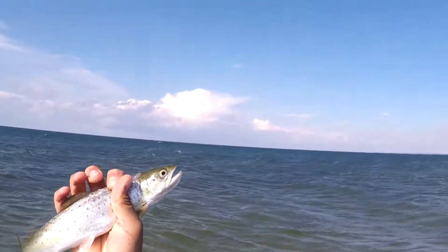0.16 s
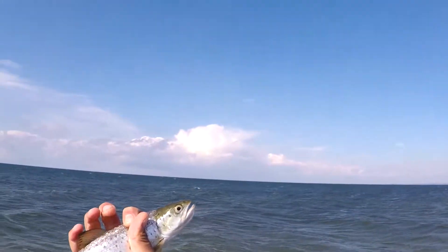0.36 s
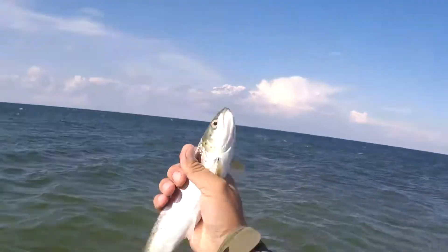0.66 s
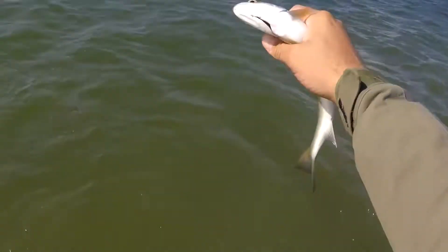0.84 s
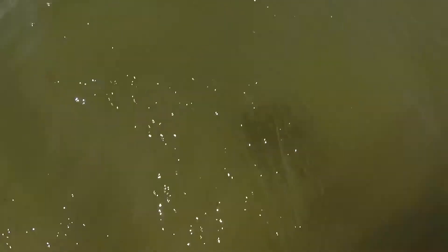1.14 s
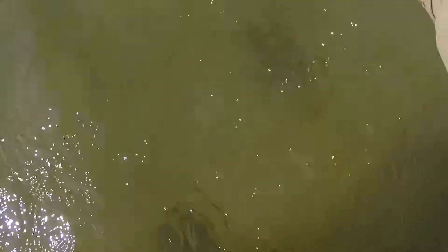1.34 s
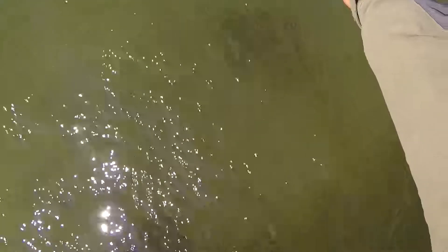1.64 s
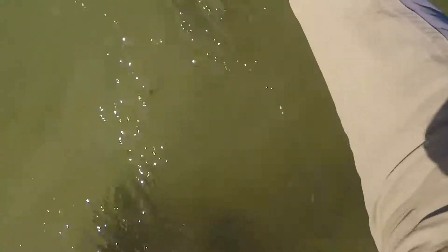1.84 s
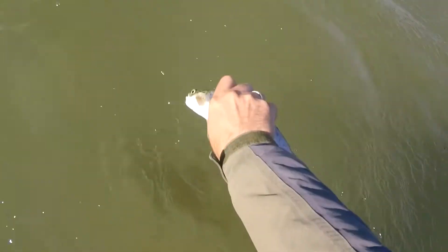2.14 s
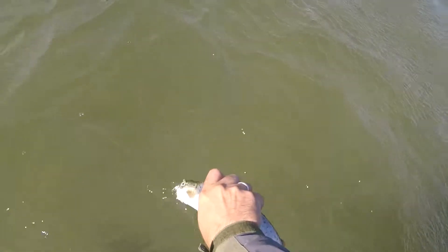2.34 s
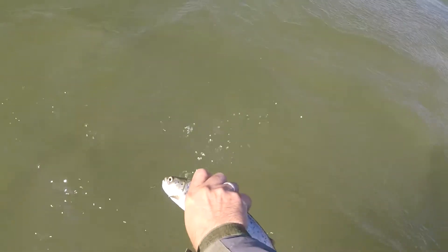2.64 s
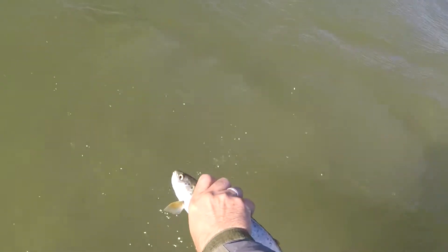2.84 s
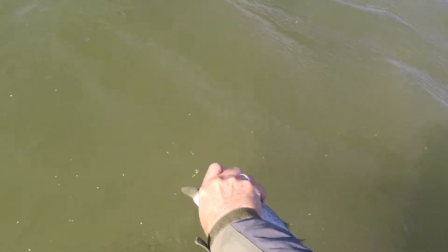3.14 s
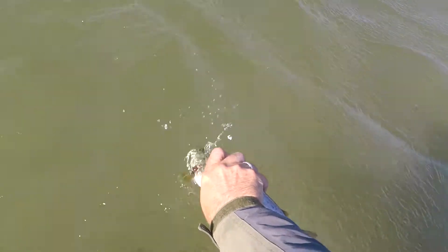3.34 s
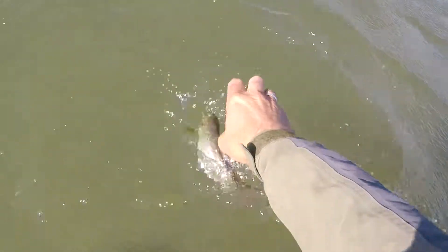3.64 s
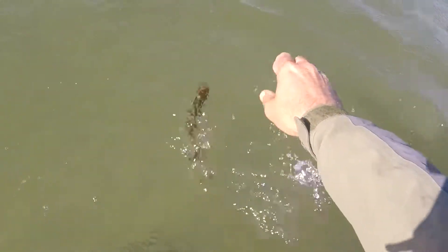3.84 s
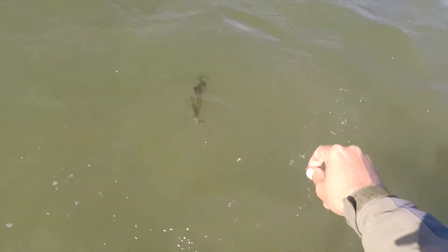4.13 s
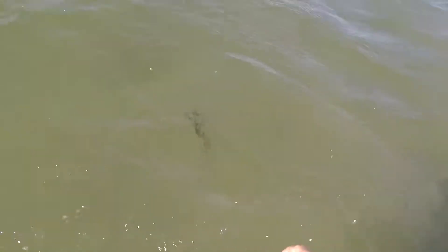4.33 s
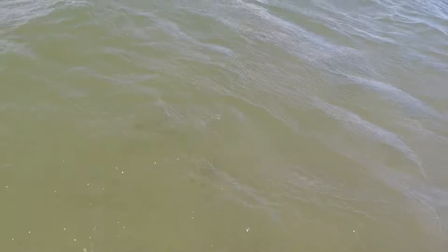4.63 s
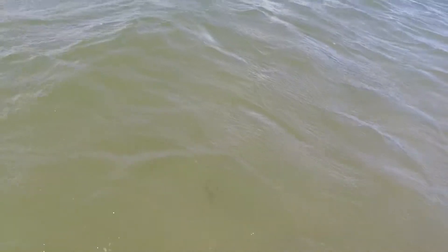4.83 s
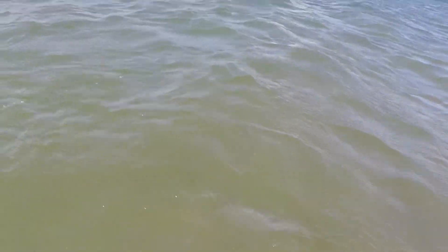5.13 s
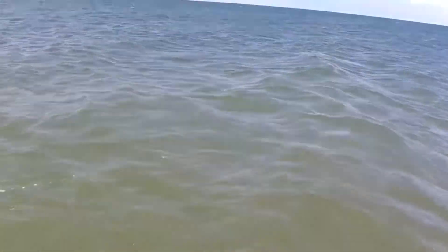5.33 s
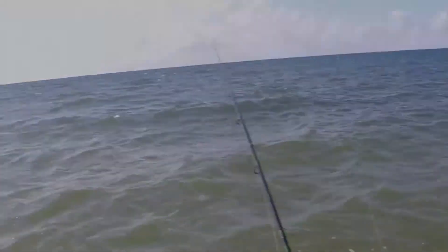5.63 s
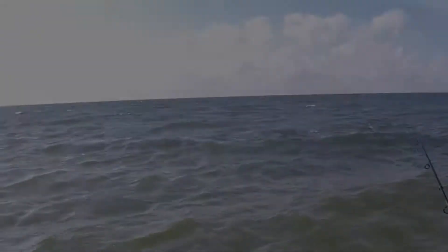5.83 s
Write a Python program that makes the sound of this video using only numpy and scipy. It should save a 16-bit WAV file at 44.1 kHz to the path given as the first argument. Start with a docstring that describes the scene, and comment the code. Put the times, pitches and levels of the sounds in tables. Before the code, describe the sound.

Hand and fish stir shallow sea water with irregular plops, splashes and bubbly gurgles while wind thumps the microphone and a sleeve rustles.

```python
"""A thump of wind and a slap of water come first, muffled, at a microphone on an angler's body.
A fish is let go in knee-deep sea water: plops and gurgles are ringing bubbles with slaps of noise.
Wind is flickering low noise with thumps; a sleeve rustles as noise and as clicks that ring a plastic case.
Drops and cloth snaps tick, a wavering sine whistles faintly twice, and banded noise is the wash of small waves.
"""
import sys
import numpy as np
from scipy import signal
from scipy.io import wavfile

SR = 44100
rng = np.random.default_rng(int(sys.argv[2]) if len(sys.argv) > 2 else 0)


def wrap_up_sound(samples):
    """Save the sound to the file named by the first command line argument, as 16-bit audio."""
    columns = np.atleast_2d(samples).T
    # keep every value between -1 and 1, then stretch to whole-number steps
    tamed = np.clip(columns, -1, 1)
    steps = np.round(tamed * 32767).astype(np.int16)
    wavfile.write(sys.argv[1], SR, steps)


N = 263585


def from_db(db):
    """Logarithmic level: decibels to amplitude gain."""
    return 10 ** (np.asarray(db) / 20)


def rms_one(x):
    """Power normalisation: scale to unit rms."""
    return x / np.sqrt(np.mean(x ** 2) + 1e-20)


def at_hz(points, hz):
    """Spectral envelope: interpolate levels on a log-frequency axis."""
    point_hz, point_db = np.array(points).T
    return np.interp(np.log(hz), np.log(point_hz), point_db)


def in_time(rows):
    """Control envelopes: each column after the time, interpolated to one value per sample."""
    s, *columns = np.transpose(rows)
    return [np.interp(np.arange(N) / SR, s, column) for column in columns]


def drift(rate):
    """Low-passed random fluctuation of rms 1: noise through two equal poles with a corner at rate Hz."""
    step = 40  # samples per coarse value
    r = np.exp(-2 * np.pi * rate * step / SR)
    coarse = rng.standard_normal(N // step + 2002)
    slow = signal.lfilter([1], [1, -2 * r, r * r], coarse)[2000:]  # the filter has settled
    return np.interp(np.arange(N) / step, np.arange(len(slow)), rms_one(slow))


def patchy_noise(spectrum, shared_db, own_db, rate):
    """Band-wise modulation: third-octaves of noise flicker partly together, partly alone; rms 1."""
    out, together = 0, drift(rate)
    edges = 25 * 2 ** (np.arange(29) / 3)
    white = rng.standard_normal((2, N))  # neighbouring bands use different noises
    for k, (low, high) in enumerate(zip(edges, edges[1:])):
        sos = signal.butter(2, [low, high], "band", fs=SR, output="sos")
        band = signal.sosfilt(sos, white[k % 2])
        band_db = at_hz(spectrum, np.sqrt(low * high))
        out = out + band * from_db(band_db + shared_db * together + own_db * drift(rate))
    return rms_one(out)


def random_sizes(spread_db):
    """Exponential spread of level in dB, capped at four times its mean, with random sign."""
    return from_db(spread_db * np.minimum(rng.exponential(1, N), 4)) * rng.choice([-1, 1], N)


def grains(per_s, low_hz, high_hz, cycles, spread_db, tilt_db):
    """Granular resonance: random clicks ring 18 two-pole resonators, tilted in dB per octave; rms 1."""
    clicks = random_sizes(spread_db) * (rng.random(N) < per_s / SR) + 1e-18
    dealt, out = rng.integers(0, 18, N), 0
    for k, hz in enumerate(np.geomspace(low_hz, high_hz, num=18)):
        r = from_db(-60 * hz / (cycles * SR))  # each pass falls 60 dB in the given cycles
        poles = [1, -2 * r * np.cos(2 * np.pi * hz / SR), r * r]
        once = signal.lfilter([1, 0, -1], poles, clicks * (dealt == k))
        ring = signal.lfilter([1 - r], poles, once)  # the second pass softens the onset
        out = out + rms_one(ring) * from_db(tilt_db * np.log2(hz / low_hz))
    return rms_one(out)


BURST_ROUNDNESS = 1.5   # 1 a pointed peak, 2 a bell


def bursts(rows, rise, slow_tail, splash_tail):
    """Cavity resonance: brief tones climb in pitch as a cavity shrinks; a slap of noise may go with each.

    Rows: peak_s, peak_db, pitch_hz, length_ms, then optional slap_rel_db and slap_top_hz."""
    tones, splashes = np.zeros((2, N + SR))
    noises = rng.standard_normal((len(rows), SR // 8))
    for (peak_s, db, hz, ms, *splash), phase, noise in zip(rows, rng.random(len(rows)), noises):
        width = ms / 2355  # s, the standard deviation of a bell with that half-level length
        span = min(len(noise), int(40 * width * SR))
        t = np.arange(span) / SR - 4.5 * width  # 0 at the peak
        side = np.where(t < 0, width / slow_tail, width * slow_tail)
        away = np.hypot(t / side, .5)
        fade_in = np.sin(np.pi / 4 * np.clip(t / width + 4.5, 0, 2)) ** 2
        shape = fade_in * np.exp(-.7 * (away ** BURST_ROUNDNESS - .5 ** BURST_ROUNDNESS))
        # the pitch climbs from (1 - rise) to (1 + rise) times hz
        climb = 2 * rise * width * np.log(np.cosh(np.minimum(t / width / 2, 20)))
        tone = np.cos(2 * np.pi * hz * (t + climb) + 2 * np.pi * phase)
        start = round((peak_s + t[0]) * SR)
        skip = max(0, -start)
        place = slice(start + skip, start + span)
        tones[place] += (from_db(db) * shape * tone)[skip:]
        if splash:
            rel_db, top_hz = splash if len(splash) == 2 else (splash[0], 14500)  # a snap is broadband
            band = signal.butter(7, [0.673 * hz, max(top_hz, 1.15 * hz)], "band", fs=SR, output="sos")
            onset = np.sin(np.pi / 4 * np.clip(t / width + 2, 0, 2)) ** 2
            dying = onset * np.exp(-np.maximum(t, 0) / (splash_tail * width))
            slap = rms_one(signal.sosfilt(band, noise))[:span]
            splashes[place] += (from_db(db + rel_db) * dying * slap)[skip:]
    return tones[:N], splashes[:N]


SWARM_MS, SWARM_DB, SWARM_SPREAD_DB = 16, -14, 3   # delay scale, level re the burst, spread either way
SWARM_CYCLES = 3.7   # length of each bubble in cycles


def swarm(rows, count):
    """Random secondary emission: smaller bubbles follow each burst at random, scattered over its band.

    Rows in: peak_s, peak_db, low_hz, top_hz; out: peak_s, peak_db, pitch_hz, length_ms."""
    draws = np.minimum(rng.random((len(rows), count, 3)), .95)
    out = []
    for (burst_s, db, low_hz, top_hz), own in zip(rows, draws):
        for late, size, place in own:
            peak_s = burst_s + .004 - SWARM_MS / 1000 * np.log(1 - late)  # exponential delay
            peak_db = db + SWARM_DB - 9 * late + SWARM_SPREAD_DB * (2 * size - 1)  # later is weaker
            pitch_hz = low_hz * (top_hz / low_hz) ** place
            out.append((peak_s, peak_db, pitch_hz, 1000 * SWARM_CYCLES / pitch_hz))
    return out


# density of wind noise: pitch_hz [Hz], level_db [relative dB per Hz]
WIND_SPECTRUM = [(20, -41), (50, -0.5), (110, 12), (200, 11), (330, 4.5), (600, -2.5), (1500, -67.5)]
# wind on the port: time_s [s, point on the level curve], level_db [dB rms, before the gain in wind()]
GUSTS = [(0, -17), (.04, -33.5), (.25, -38.5), (.4, -40.5), (.53, -50.5), (.8, -49), (.88, -45),
         (1.1, -45.5), (1.21, -34), (1.33, -33), (1.4, -45.5), (1.6, -37.5), (1.76, -33.5), (1.91, -30),
         (1.98, -35), (2.13, -27), (2.28, -36.5), (2.58, -38), (2.68, -32), (2.98, -44.5), (3.1, -42),
         (3.39, -51.5), (3.58, -46.5), (3.62, -34), (3.7, -40.5), (3.78, -21), (3.84, -26), (3.87, -24),
         (3.98, -26.5), (4.06, -34.5), (4.18, -31), (4.31, -36.5), (4.41, -26.5), (4.61, -34), (4.65, -43),
         (4.7, -36.5), (4.76, -45), (5.24, -47.5), (5.36, -52), (5.59, -40.5), (5.7, -38), (5.75, -31.5),
         (5.82, -40), (5.89, -43), (5.98, -39)]
# strongest eddies on the port: peak_s [s, moment of the burst's peak], peak_db [dB], pitch_hz [Hz],
# length_ms [ms, about half level]
BUFFETS = [(.016, -3.5, 220, 4.8), (.03, -13.5, 219, 8.9), (.384, -32, 330, 8.5), (.908, -31, 238, 7.8),
           (1.207, -23.5, 205, 7.8), (1.764, -21, 242, 8), (2.019, -20.5, 210, 15), (2.065, -25.5, 300, 17),
           (2.121, -21, 293, 7.1), (2.51, -16, 229, 4.6), (2.542, -18.5, 136, 7.2), (2.691, -12, 175, 7.3),
           (2.699, -15.5, 232, 2.3), (2.748, -27, 190, 8.5), (2.734, -15, 207, 4.2), (3.63, -24.5, 137, 13),
           (3.731, -19.5, 282, 8.7), (3.863, -9, 138, 10.4), (3.891, -10.5, 278, 10),
           (4.041, -17, 160, 9.8), (4.136, -21, 123, 17), (4.15, -22.5, 190, 12), (4.18, -16, 300, 7.8),
           (4.398, -14.5, 222, 6.4), (4.488, -7, 195, 10.8), (4.598, -17, 220, 3.9), (5.553, -26, 322, 12),
           (5.759, -16, 191, 6.1), (5.799, -24, 287, 3)]


def wind():
    """Turbulent pressure: lumpy low noise on the port, with the strongest eddies as single thumps."""
    level_db, = in_time(GUSTS)
    lumps = patchy_noise(WIND_SPECTRUM, shared_db=2.5, own_db=2.0, rate=18.7)
    thumps = sum(bursts(BUFFETS, rise=0.041, slow_tail=0.94, splash_tail=2))
    return from_db(level_db + 2.0) * lumps + thumps


SLAP_DB, SLAP_DB_PER_OCTAVE = -6, -3.5   # slap re a 500 Hz plop; small pockets slap less
# water stirred by legs, hand and fish: time_s [s, point on the level curves],
# level_db [dB, gurgle before the gain in water()], sharp_db [dB, share of small bubbles, likewise]
SLOSH = [(0, -17.5, 5.5), (.04, -34, 10), (.15, -42.5, 8.5), (.22, -38, 7), (.3, -42.5, 11),
         (.4, -39.5, 8.5), (.53, -51, 14.5), (.76, -44, 7), (.87, -46.5, 12), (1.1, -54, 13.5),
         (1.27, -37, 12.5), (1.4, -47, 13.5), (1.65, -43.5, 10), (1.88, -33.5, 5), (1.98, -43, 13.5),
         (2.13, -25.5, 4), (2.23, -27.5, 2.5), (2.3, -32, 2.5), (2.35, -27.5, -1), (2.4, -30, 0),
         (2.43, -32.5, 8), (2.462, -36, 11), (2.49, -32, 12.5), (2.525, -33, 7), (2.6, -35, 11),
         (2.68, -33, 15.5), (2.77, -35.5, 9), (2.86, -37.5, -6), (2.91, -37, 5), (2.98, -34.5, 8),
         (3.13, -55.5, 14), (3.5, -74, -10), (3.69, -52.5, 19), (3.78, -32, 1.5), (3.845, -33.5, 6),
         (3.87, -25.5, 6.5), (3.98, -18.5, 1), (4.02, -29.5, 10), (4.058, -29.5, 1), (4.11, -27.5, 2),
         (4.16, -24, -2), (4.22, -28.5, 5), (4.28, -30.5, 7.5), (4.33, -43, 15), (4.365, -35.5, 5),
         (4.4, -37, 9.5), (4.45, -31, 4.5), (4.54, -40.5, 9.5), (4.62, -47, 17), (4.65, -53, 18),
         (4.7, -52, 16), (4.95, -52.5, 15), (5.03, -52, 8), (5.15, -51, 3), (5.24, -40, 1),
         (5.36, -55.5, -3), (5.53, -40.5, 5), (5.6, -41.5, 9), (5.67, -34, 5), (5.75, -22, -6.5),
         (5.89, -52, 18), (5.98, -30.5, 8.5)]
# air pockets that burst: peak_s [s, moment of the burst's peak], peak_db [dB], pitch_hz [Hz],
# length_ms [ms, about half level], slap_top_hz [Hz, top of the slap]
PLOPS = [(.004, -14.5, 600, 5.3, 1380), (.012, -13.5, 920, 3, 1570), (.014, -11, 365, 13, 945),
         (.023, -18.5, 720, 4.3, 1650), (.032, -23, 503, 7.9, 1320), (.21, -29.5, 680, 3.8, 1250),
         (.215, -41, 1900, 2.6, 2500), (.232, -32, 745, 6.1, 944), (.355, -32.5, 480, 5, 900),
         (.367, -34.5, 770, 6.1, 2130), (.747, -30.5, 1000, 5.5, 1320), (0.759, -32, 1150, 3.6, 1690),
         (.769, -21.5, 837, 3.66, 1140), (.785, -36.5, 854, 5.6, 1200), (.82, -38.5, 880, 7.4, 1200),
         (1.129, -24.5, 2510, 3, 3200), (1.193, -38.5, 2400, 3.9, 3000), (1.276, -26, 650, 6.4, 1000),
         (1.3, -21, 550, 4.9, 826), (1.313, -30, 680, 5.8, 1000), (1.733, -38, 2370, 5.1, 2900),
         (1.773, -29, 410, 8, 930), (1.87, -15, 526, 6, 1100), (1.896, -26.5, 710, 4.2, 1770),
         (1.9, -38, 2500, 2.05, 2880), (1.998, -42, 2380, 2.7, 2700), (2.073, -17.5, 550, 5.5, 895),
         (2.087, -35, 2270, 3.5, 2970), (2.108, -12.5, 667, 2.8, 1300), (2.116, -15, 720, 5.3, 1390),
         (2.148, -6.5, 840, 3.24, 1670), (2.154, -12, 1100, 2.5, 1780), (2.166, -25, 646, 7.1, 1460),
         (2.173, -24, 1050, 2.1, 1650), (2.105, -35, 2600, 3, 3000), (2.19, -29, 1630, 3.8, 1900),
         (2.205, -40, 2670, 4, 3000), (2.192, -24.5, 970, 15, 1950), (2.234, -11, 610, 5, 842),
         (2.258, -21.5, 570, 5.2, 860), (2.288, -26, 890, 4.7, 1200), (2.319, -22.5, 2140, 0.87, 2880),
         (2.334, -21, 348, 6.6, 734), (2.34, -33, 2400, 8.7, 2800), (2.35, -12.5, 816, 6.9, 1960),
         (2.41, -24, 400, 4.3, 716), (2.42, -25, 1370, 2.5, 2110), (2.442, -24, 776, 4.5, 1060),
         (2.511, -31.5, 1240, 6.5, 1950), (2.539, -23.5, 550, 8, 1380), (2.558, -23, 530, 7, 790),
         (2.57, -13.5, 1550, 1.65, 2120), (2.576, -23, 750, 8, 970), (2.598, -21.5, 1410, 4.3, 1720),
         (2.613, -22, 1740, 3.8, 2420), (2.634, -24, 650, 8.5, 850), (2.639, -30, 2600, 4.5, 3900),
         (2.665, -25.5, 493, 7.5, 990), (2.68, -42, 1500, 5.4, 2630), (2.697, -14.5, 950, 3, 1920),
         (2.7, -13.5, 480, 5.3, 845), (2.721, -20.5, 500, 6.7, 1020), (2.795, -29.5, 900, 2.4, 1810),
         (2.812, -26, 650, 8.1, 840), (2.825, -12.5, 966, 3, 2260), (2.842, -24, 770, 13, 1980),
         (2.858, -26.5, 2120, 2.45, 2770), (2.872, -22.5, 1030, 4.1, 1330), (2.884, -25.5, 900, 3.1, 1480),
         (2.93, -36, 1800, 2.4, 2600), (2.941, -31.5, 1500, 3.6, 2830), (2.959, -30, 1370, 5.8, 1930),
         (2.976, -37, 1600, 3.1, 2000), (3.013, -26, 1500, 3.4, 1970), (3.035, -39.5, 1300, 8.5, 2520),
         (3.124, -35, 590, 5.1, 736), (3.162, -52, 300, 9.7, 417), (3.704, -34.5, 710, 4.9, 1070),
         (3.757, -25.5, 890, 5.9, 1730), (3.765, -15.5, 400, 10.2, 810), (3.798, -15.5, 347, 12.8, 785),
         (3.783, -20, 480, 5, 900), (3.795, -28.5, 1500, 2.3, 2200), (3.821, -25, 330, 7.4, 700),
         (3.86, -14, 393, 6.4, 580), (3.886, -17.5, 553, 7, 1330), (3.901, -18.5, 380, 4.4, 1000),
         (3.902, -21.5, 2570, 2.1, 3830), (3.879, -36, 2800, 2.5, 3100), (3.915, -25, 1900, 1.7, 2700),
         (3.928, -25, 2300, 1.4, 2700), (3.951, -23, 1250, 2.8, 2500), (3.947, -15, 550, 4.3, 1500),
         (3.965, -17, 470, 7, 1080), (3.98, -18, 1100, 5.3, 1900), (3.987, -12.5, 720, 4.5, 1630),
         (3.993, -40, 2900, 1.3, 3100), (4.001, -30, 2200, 3, 2600), (4.023, -16.5, 576, 8.4, 737),
         (4.048, -25.5, 720, 4, 1000), (4.072, -13.5, 1020, 2.1, 1650), (4.079, -20.5, 1410, 3.5, 1980),
         (4.103, -15.5, 633, 2.75, 1430), (4.125, -19, 720, 5.5, 1400), (4.146, -14.5, 1340, 1.34, 2000),
         (4.155, -27.5, 448, 8.1, 1100), (4.161, -31, 1500, 2, 1900), (4.196, -42, 2750, 2.7, 3200),
         (4.206, -31, 1700, 3.7, 1950), (4.166, -28, 810, 3.8, 1160), (4.213, -11.5, 760, 2.2, 1670),
         (4.221, -14.5, 700, 3.9, 1680), (4.241, -23.5, 736, 3.2, 1610), (4.273, -21, 556, 8.7, 1060),
         (4.25, -40, 2850, 3, 3500), (4.274, -38, 2000, 2.2, 2300), (4.287, -20, 420, 8.2, 980),
         (4.301, -36, 660, 2.8, 1040), (4.33, -14.5, 846, 3.2, 1950), (4.397, -22, 450, 9.8, 845),
         (4.451, -19.5, 450, 4.7, 1100), (4.518, -17.5, 606, 4.16, 1510), (4.555, -33, 600, 4.3, 900),
         (4.607, -34, 500, 4.3, 1195), (4.61, -44, 1900, 4, 2200), (4.69, -37.5, 460, 8.1, 1100),
         (4.735, -40.5, 427, 6, 1300), (4.77, -45, 700, 4.6, 900), (4.99, -41.5, 850, 6.8, 1000),
         (5.015, -42, 800, 9.3, 1000), (5.028, -36, 793, 5.5, 1040), (5.05, -41, 760, 8.3, 1000),
         (5.062, -37, 720, 4, 900), (5.083, -46, 850, 4.2, 1000), (5.184, -27.5, 896, 2.25, 1690),
         (5.197, -17.5, 750, 4, 1170), (5.189, -13, 514, 5.27, 990), (5.194, -36, 825, 3, 1590),
         (5.2, -16.5, 470, 3.7, 1110), (5.204, -35, 900, 2, 1760), (5.221, -30, 747, 11.4, 1000),
         (5.235, -35, 710, 8.4, 1220), (5.643, -33.5, 900, 7.1, 2130), (5.624, -33, 310, 8.3, 600),
         (5.644, -38, 1850, 4.1, 2100), (5.672, -30, 620, 6, 1030), (5.688, -25, 560, 6.5, 1000),
         (5.701, -26, 487, 12.4, 1120), (5.723, -17, 705, 3, 1570), (5.74, -19.5, 570, 3.25, 1020),
         (5.731, -47, 3000, 3.9, 3200), (5.749, -29.5, 1250, 6.1, 1780), (5.755, -16, 420, 3.1, 1000),
         (5.758, -32, 472, 11, 960), (5.77, -23, 1220, 2.5, 1680), (5.815, -41, 1150, 6.2, 1500),
         (5.906, -35, 1050, 5, 1280), (5.919, -21.5, 1420, 2.1, 2410), (5.921, -47, 2300, 2, 3100),
         (5.937, -43.5, 3150, 5.3, 3600), (5.924, -26.5, 365, 10.6, 527), (5.945, -29, 1180, 2.6, 1960),
         (5.97, -36, 1330, 2, 1790)]


def water():
    """Bubble resonance: large and small bubbles ring in clumps; the share of small ones has its own curve."""
    level_db, sharp_db = in_time(SLOSH)
    clumps = from_db(3.0 * drift(11.0))
    large = grains(700 * clumps, low_hz=330, high_hz=1100, cycles=4.26, spread_db=2.0, tilt_db=-3.5)
    small = grains(1200 * clumps, low_hz=1000, high_hz=3045, cycles=14.0, spread_db=0.5, tilt_db=-4.0)
    gurgle = from_db(level_db - 3.0) * (large + from_db(sharp_db - 20.0) * small)
    plops = [(s, db, hz, ms, SLAP_DB + SLAP_DB_PER_OCTAVE * np.log2(hz / 500), top_hz)
             for s, db, hz, ms, top_hz in PLOPS]
    after = swarm([(s, db, 0.88 * hz, top_hz) for s, db, hz, ms, top_hz in PLOPS], count=8)
    return gurgle + sum(bursts(plops + after, rise=0.087, slow_tail=1.036, splash_tail=3.43))


# density of the wash: pitch_hz [Hz], level_db [relative dB per Hz]
SEA_SPECTRUM = [(18, -49.5), (30, -29), (114, -3), (252, -0.5), (503, -23.5), (711, -8.5), (2010, -26),
                (3630, -29.5), (6420, -71.5), (11100, -71.5), (14400, -100), (22000, -120)]


def sea():
    """Superposed small waves: a steady dull wash of noise, its bands flickering slowly."""
    return from_db(-51.5) * patchy_noise(SEA_SPECTRUM, shared_db=1.2, own_db=1.5, rate=5.0)


TICK_MS = 1.7   # about half level, before slow_tail stretches it
# density of the rustle: pitch_hz [Hz], level_db [relative dB per Hz]
RUSTLE_SPECTRUM = [(1200, -15), (2200, -23.5), (3200, 13.5), (5000, 2.5), (6300, -0.5), (7200, -32.5),
                   (9000, -60), (12000, -91), (20000, -110)]
# sleeve and spray: time_s [s, point on the level curves], level_db [dB, before the gains in sleeve()],
# top_db [dB, fine treble re level_db, likewise]
RUB = [(0, -56.5, -36), (.25, -60.5, -31), (.53, -69.5, -26), (.83, -65, -26), (.87, -63, -25),
       (1.1, -65, -8), (1.18, -46.5, -17), (1.215, -54, -7), (1.27, -51, -12), (1.4, -61, -12),
       (1.5, -56.5, -15), (1.6, -57.5, -14), (1.68, -56.5, -12), (1.76, -52, -5), (1.83, -52, -10),
       (1.9, -53, -3), (1.98, -48, -21), (2.11, -49.5, -9), (2.28, -52, -29), (2.58, -54, -34),
       (2.68, -45, -45), (2.74, -52, -45), (2.98, -55, -34), (3.21, -65, -23), (3.4, -68, -7),
       (3.49, -81, 4), (3.52, -58, -21), (3.58, -62.5, -9), (3.69, -51, -10), (3.77, -55, -8),
       (3.83, -46.5, -6), (3.91, -39, -20), (3.98, -48, -30), (4.03, -49.5, -25), (4.07, -57.5, -21),
       (4.12, -51, -20), (4.16, -53, -24), (4.27, -51, -29), (4.36, -56, -25), (4.48, -51.5, -41),
       (4.76, -59, -24.5), (5.16, -70, -11.5), (5.24, -62, -16), (5.36, -69, -17), (5.52, -63, -18),
       (5.55, -55, -30), (5.6, -57, -5), (5.645, -43, -19), (5.73, -58, -12), (5.98, -57.5, -21)]
# drops and cloth snaps: peak_s [s, moment of the burst's peak], peak_db [dB], pitch_hz [Hz],
# crackle_rel_db [dB re the peak, before the crackle drives the case]
TICKS = [(1.176, -43, 4870, -16), (1.188, -48, 4300, -15), (1.252, -43.5, 5240, -2),
         (1.704, -53, 6460, -15), (1.755, -39, 6970, -16), (1.757, -42.5, 4370, -15),
         (1.27, -48, 5200, -17), (1.809, -54, 9200, -14), (1.897, -54, 9600, -12), (1.91, -59, 8100, -10),
         (1.911, -59, 9800, -12), (1.81, -56, 6600, -17), (1.824, -55, 6500, -13), (1.827, -51, 5200, -15),
         (1.85, -45, 5400, -1), (1.892, -39.5, 5200, -3), (2.05, -35.5, 5070, -6), (2.086, -41, 5110, -10),
         (2.087, -45, 4200, -15), (2.101, -41, 5900, -1), (2.102, -44, 8840, -7), (2.102, -51, 9800, -5),
         (2.102, -44, 8100, -10), (2.12, -38.5, 4160, 0), (2.161, -39, 3480, -9), (2.199, -43, 5400, -7),
         (2.194, -60, 8700, -15), (2.245, -60, 8600, -13), (2.226, -38, 3960, -14), (2.337, -51, 5710, -7),
         (2.578, -60, 8000, -8), (2.603, -42, 5000, -15), (2.622, -54, 5400, -15), (2.64, -42, 4000, -19),
         (2.687, -52, 5500, 2), (2.692, -64, 9200, -10), (2.769, -41, 3140, -23), (2.788, -43, 3620, -18),
         (2.831, -45, 5500, -6), (2.832, -68, 8300, -10), (2.842, -53, 5700, -12), (2.895, -49, 4000, -14),
         (2.929, -58, 5000, -1), (3.04, -47, 3100, -15), (3.099, -49, 3000, -19), (3.249, -48, 1400, -18),
         (3.512, -35, 4280, -5), (3.513, -41, 6150, -20), (3.518, -45, 7600, -9), (3.563, -58, 7900, -15),
         (3.621, -44, 5800, -1), (3.663, -49, 7900, -12), (3.676, -41.5, 4150, -2), (3.696, -44.5, 4550, 7),
         (3.712, -35, 3410, -15), (3.721, -40.5, 4600, 3), (3.724, -40, 6340, -8), (3.791, -47, 5040, -10),
         (3.792, -46, 8300, -10), (3.793, -58, 10600, -10), (3.868, -44, 5200, -12),
         (3.803, -30.5, 3470, -5.5), (3.766, -38, 2970, -18), (3.803, -51, 10100, -14),
         (3.877, -40, 4430, -16), (3.902, -31, 4350, -5), (3.914, -33, 5060, -13), (3.927, -36, 3800, -18),
         (4.001, -38.5, 5300, -9), (4.007, -52, 7000, -12), (4.071, -50, 7400, -15),
         (4.101, -64, 8040, -14), (4.271, -42.5, 4930, -21), (4.101, -37, 4400, -5.5),
         (4.183, -36.5, 3460, -18), (4.27, -28, 2970, -31), (4.285, -39, 3420, -24), (4.412, -49, 5200, -9),
         (5.527, -59.5, 5470, 6), (5.607, -55, 5790, -12), (5.622, -46, 5260, -12), (5.644, -50, 4430, 4)]


def sleeve():
    """Stick-slip friction: stiff cloth and spray give patchy hiss, fine crackle and snaps that ring the case."""
    level_db, top_db = in_time(RUB)
    rub = patchy_noise(RUSTLE_SPECTRUM, shared_db=2.5, own_db=2.0, rate=15.0)
    scratch_per_s = 1500 * from_db(4.0 * drift(25.0))
    scratch = rms_one(random_sizes(2.5) * (rng.random(N) < scratch_per_s / SR))
    fine = grains(1600 * from_db(7.0 * drift(4.2)), low_hz=7280, high_hz=13600,
                  cycles=47.0, spread_db=4.0, tilt_db=-32.0)
    snaps = [(*tick, TICK_MS, rel_db) for *tick, rel_db in TICKS]
    pings, crackle = bursts(snaps, rise=.02, slow_tail=1.5, splash_tail=5.0)
    after = swarm([(s, db + 6.0, 0.94 * hz, 1.06 * hz) for s, db, hz, rel_db in TICKS], count=2)
    drops = [(*drop[:3], TICK_MS) for drop in after]
    pings = pings + bursts(drops, rise=.02, slow_tail=4.6, splash_tail=2)[0]
    ringing = housing(from_db(level_db + 8.0) * scratch, from_db(18.0) * crackle, top_db, wander_db=4.5)
    hiss = from_db(level_db - 5.5) * rub
    return hiss + from_db(level_db + top_db - 7.0) * fine + ringing + pings


# modes of the plastic case: pitch_hz [Hz], width_hz [Hz, of each filter pass], gain_db [dB]
CASE = [(2520, 500, -6), (4330, 700, -11), (5760, 450, -9), (7900, 420, -18), (9330, 350, -34),
        (10500, 400, -46), (12300, 400, -60), (13500, 500, -64)]


def housing(scratch, snaps, top_db, wander_db):
    """Modal resonance: crisp rubbing reaches the higher modes; the drive wanders with the contact point."""
    out = 0
    for hz, width_hz, db in CASE:
        r = np.exp(-np.pi * width_hz / SR)
        b = (1 - r * r) / 2 * np.array([1, 0, -1])
        a = [1, -2 * r * np.cos(2 * np.pi * hz / SR), r * r]
        reach_db = (top_db + 6.5) * np.clip((hz - 4500) / 3500, 0, 1.2)
        drive = from_db(reach_db + wander_db * drift(18.0)) * scratch + snaps
        out = out + from_db(db) * signal.lfilter(b, a, signal.lfilter(b, a, drive))
    return out


DRAG_WIDTH_HZ, DRAG_GRAINS_PER_S = 400, 1700
DRAG_FADE_S = 0.0094   # fade in; the fade out takes twice as long
# cloth dragging over the housing: start_s [s], end_s [s], pitch_hz [Hz], level_db [dB rms, before the fades]
DRAGS = [(0.057, 0.103, 3080, -56.5), (0.38, 0.413, 1770, -54), (1.125, 1.2, 5500, -65),
         (1.136, 1.21, 2450, -54), (1.14, 1.21, 8000, -71), (1.17, 1.21, 6100, -63),
         (1.23, 1.28, 5380, -58), (1.23, 1.31, 8150, -72), (1.23, 1.27, 3900, -64),
         (1.165, 1.205, 4060, -57), (1.19, 1.3, 9200, -82), (1.28, 1.35, 5300, -72),
         (1.427, 1.478, 6000, -71), (1.515, 1.535, 6000, -68), (1.56, 1.604, 6050, -68),
         (1.58, 1.607, 7900, -70), (1.65, 1.67, 10500, -82), (1.76, 1.8, 10500, -79),
         (1.93, 1.98, 12300, -92), (2.165, 2.19, 13300, -89), (1.695, 1.753, 6600, -68),
         (1.745, 1.793, 2500, -58), (1.76, 1.782, 7500, -66), (1.955, 1.98, 7900, -72),
         (2.012, 2.07, 7900, -62), (2.076, 2.122, 2500, -51), (2.19, 2.198, 2530, -43),
         (2.223, 2.26, 4050, -59), (3.503, 3.56, 4250, -70), (3.512, 3.535, 6150, -70),
         (3.513, 3.57, 7750, -84), (3.596, 3.635, 7760, -69), (3.602, 3.682, 6040, -63),
         (3.655, 3.77, 7900, -72), (3.675, 3.716, 3500, -52), (3.675, 3.72, 4750, -57),
         (3.805, 3.9, 5060, -51.5), (3.895, 3.94, 8750, -64), (3.808, 3.962, 3940, -54),
         (4.01, 4.035, 6650, -61), (5.21, 5.26, 4930, -73), (5.57, 5.692, 7740, -73),
         (5.56, 5.85, 2680, -61.5)]


def drags():
    """Sustained excitation: uneven clicks keep one narrow band ringing for as long as the cloth drags."""
    out, t = np.zeros(N), np.arange(N) / SR
    clicks = rng.standard_normal(N) * (rng.random(N) < DRAG_GRAINS_PER_S / SR) + 1e-18
    for start, end, hz, db in DRAGS:
        span = slice(int((start - .02) * SR), int((end + .05) * SR))
        edges = [hz - DRAG_WIDTH_HZ / 2, hz + DRAG_WIDTH_HZ / 2]
        band = signal.butter(2, edges, "band", fs=SR, output="sos")
        fade_s = np.minimum(t[span] - start, (end - t[span]) / 2 + DRAG_FADE_S)
        fade = np.clip(fade_s / DRAG_FADE_S, 0, 1)
        out[span] += from_db(db) * fade * rms_one(signal.sosfilt(band, clicks[span]))
    return out


# a faint thin whistle, twice: start_s [s], end_s [s], pitch_hz [Hz, mean], level_db [dB rms, mean, unfaded]
WHISTLE = [(3.02, 3.43, 3660, -74), (4.46, 4.62, 3670, -67)]


def whistle():
    """Frequency and amplitude modulation: a near sine wavers as it fades in and out."""
    out, t = np.zeros(N), np.arange(N) / SR
    for start, end, hz, db in WHISTLE:
        fade = np.clip(np.minimum(t - start, end - t) / .03, 0, 1)
        gain = np.sqrt(2) * from_db(db + 1.5 * drift(20.0))
        phase = 2 * np.pi * np.cumsum(hz + 12 * drift(8.0)) / SR
        out += fade * gain * np.sin(phase)
    return out


def scene():
    """Superposition: all sources add at the one microphone."""
    return (wind() + water() + sea() + sleeve() + drags() + whistle())[None]


HISS_DB, CUTOFF_HZ = -92, 11200   # the microphone's own noise (rms before the roll-off); its treble corner


def record(dry):
    """Saturation and low-pass: faint hiss is added, peaks are rounded, the top rolls off."""
    hiss = from_db(HISS_DB) * rng.standard_normal(dry.shape)
    rounded = np.tanh(dry + hiss)
    return signal.sosfilt(signal.butter(1, CUTOFF_HZ, fs=SR, output="sos"), rounded)


dry = scene()
out = record(dry)
wrap_up_sound(out)
```